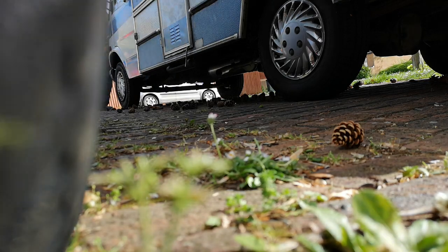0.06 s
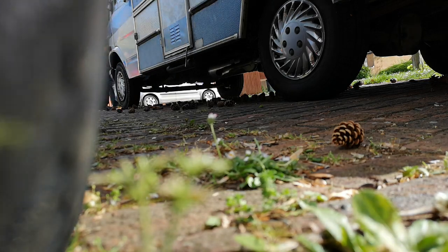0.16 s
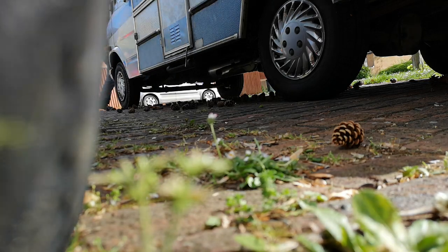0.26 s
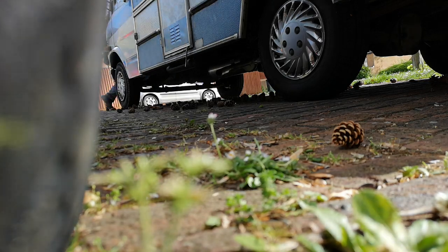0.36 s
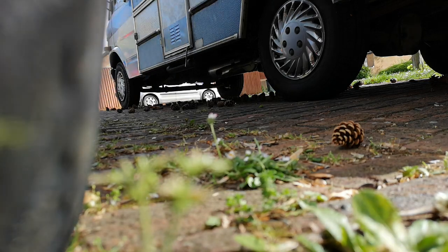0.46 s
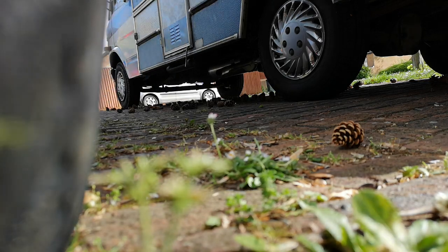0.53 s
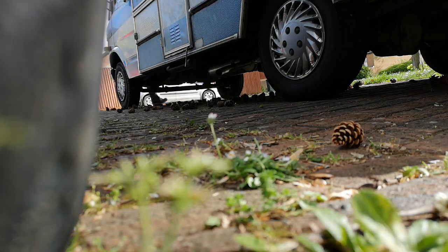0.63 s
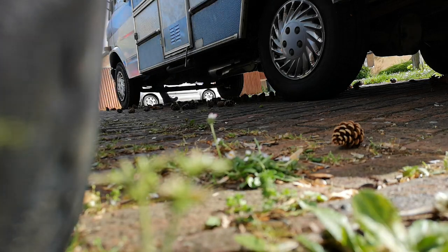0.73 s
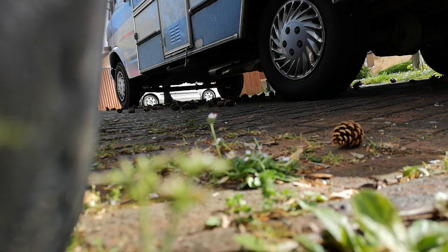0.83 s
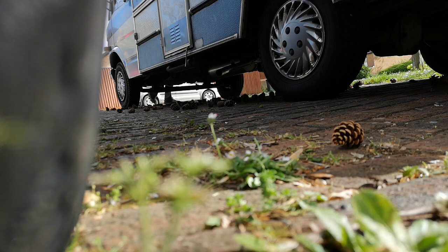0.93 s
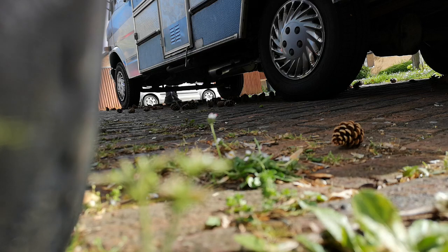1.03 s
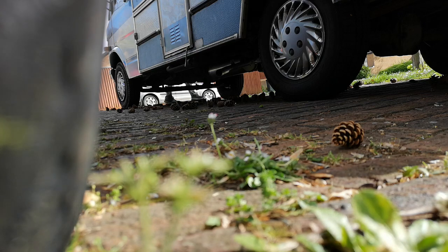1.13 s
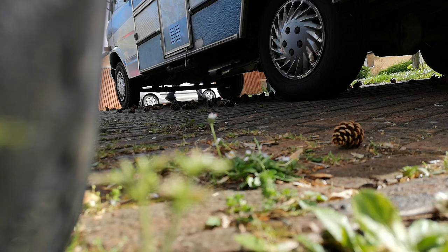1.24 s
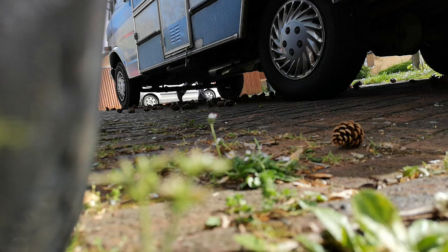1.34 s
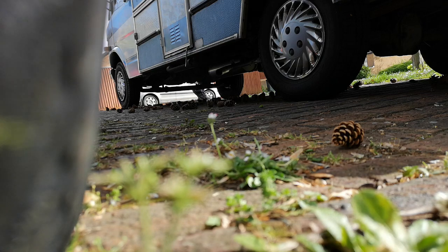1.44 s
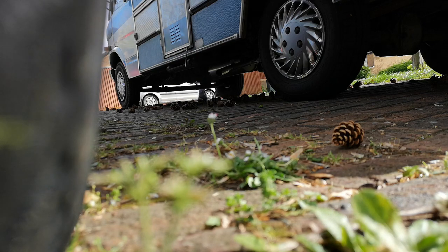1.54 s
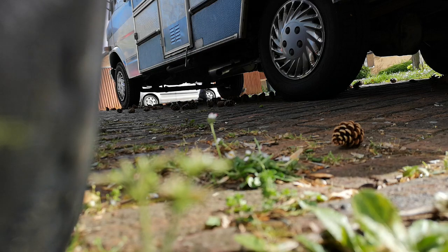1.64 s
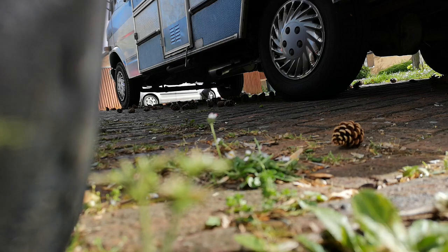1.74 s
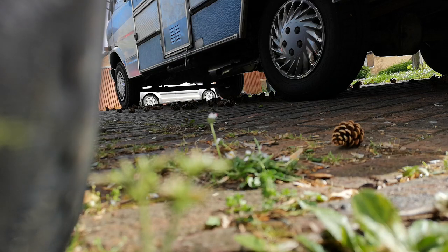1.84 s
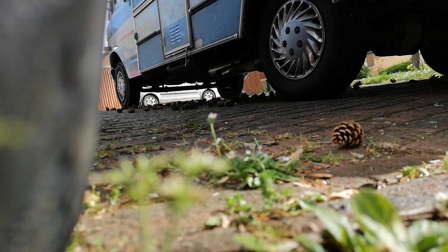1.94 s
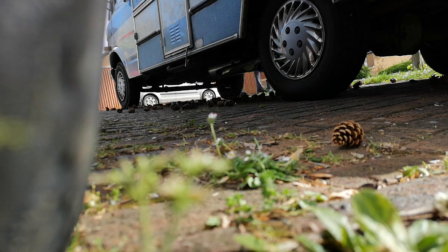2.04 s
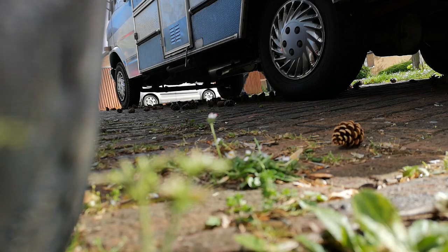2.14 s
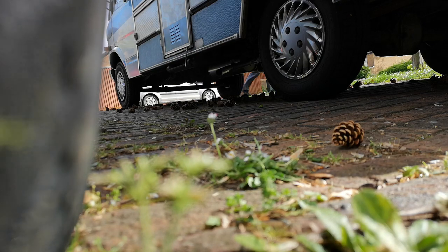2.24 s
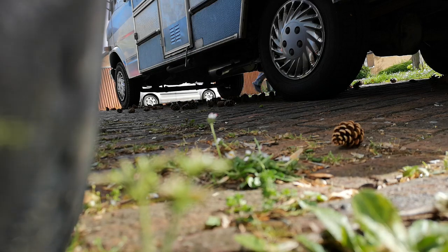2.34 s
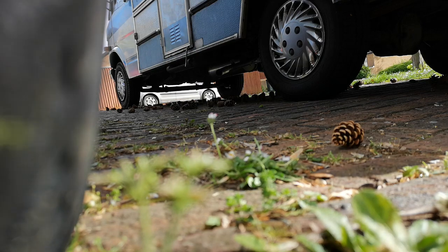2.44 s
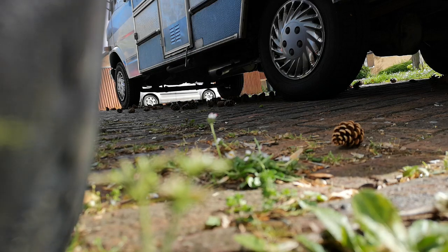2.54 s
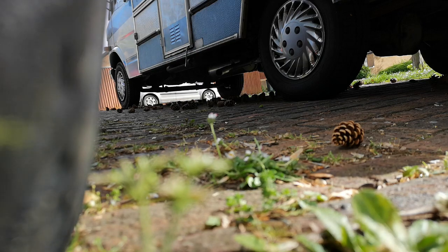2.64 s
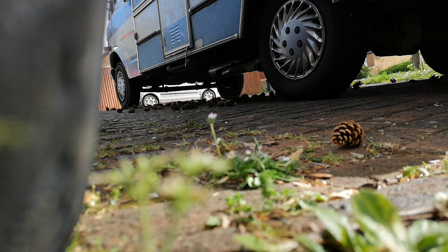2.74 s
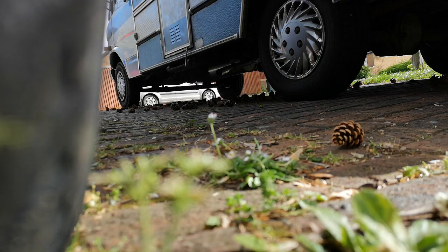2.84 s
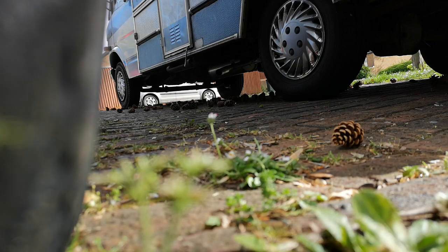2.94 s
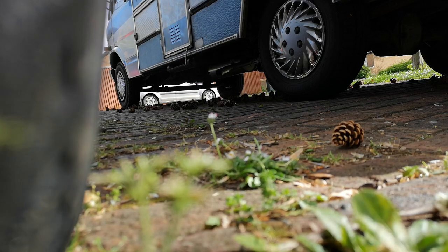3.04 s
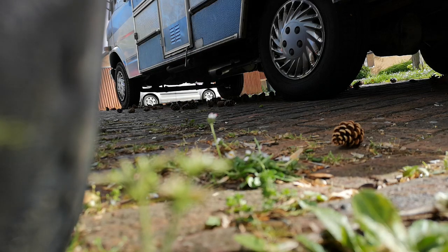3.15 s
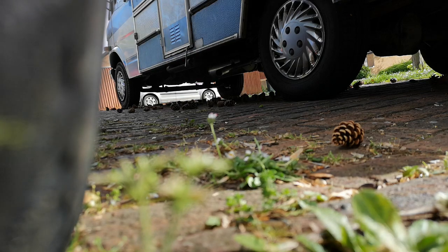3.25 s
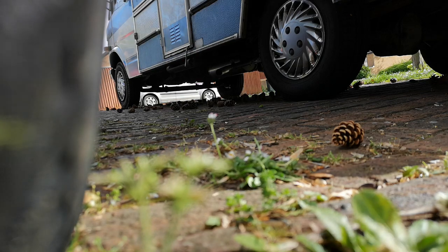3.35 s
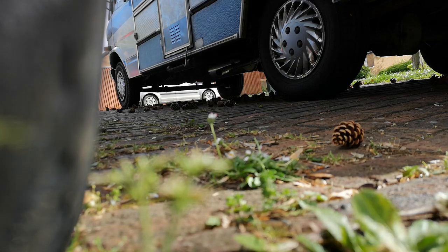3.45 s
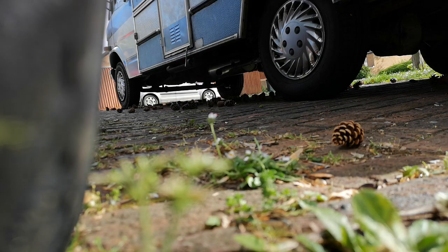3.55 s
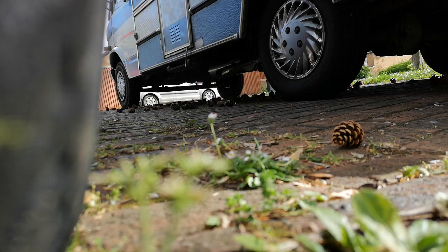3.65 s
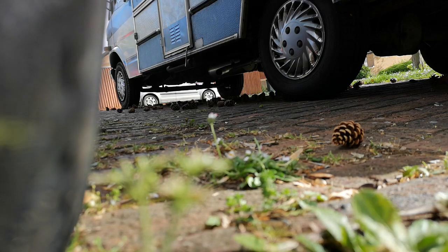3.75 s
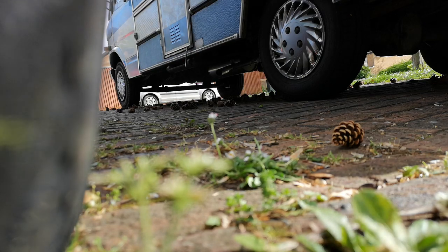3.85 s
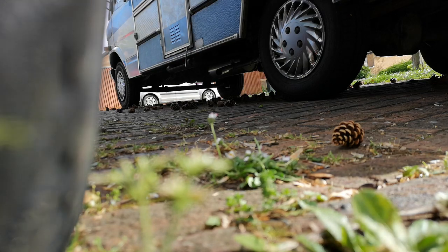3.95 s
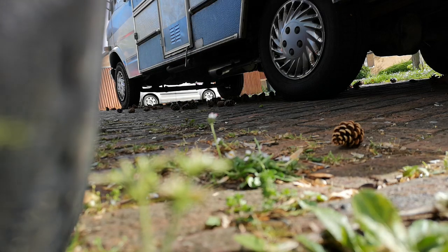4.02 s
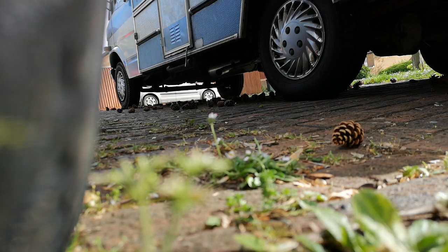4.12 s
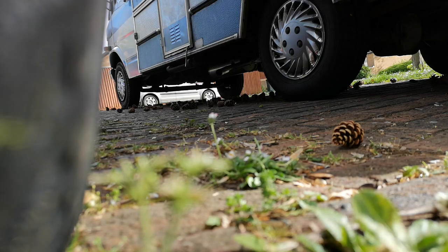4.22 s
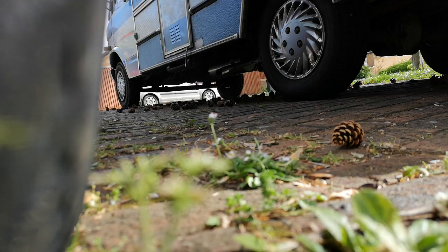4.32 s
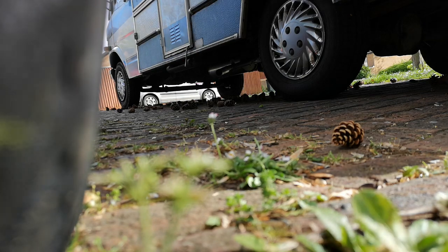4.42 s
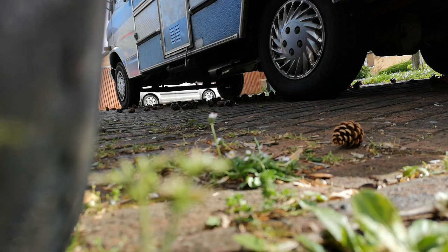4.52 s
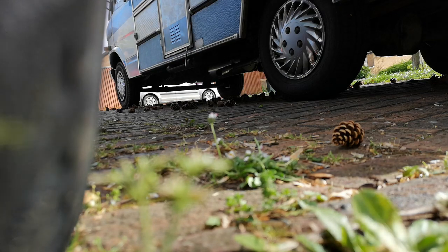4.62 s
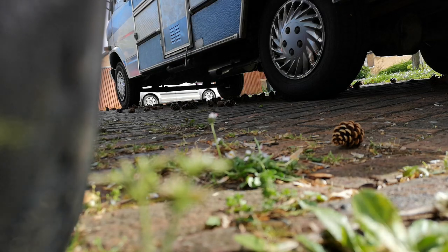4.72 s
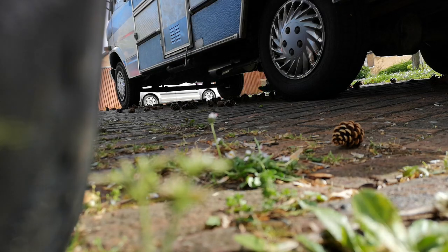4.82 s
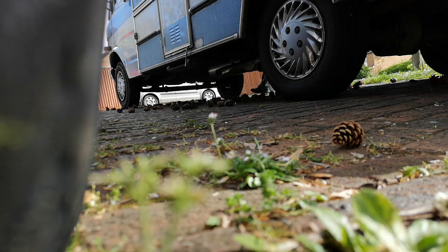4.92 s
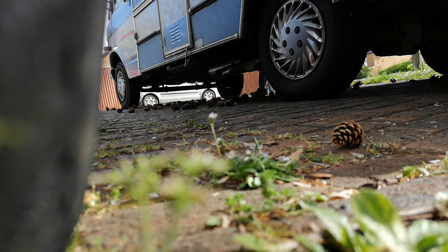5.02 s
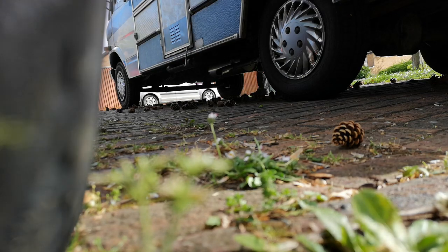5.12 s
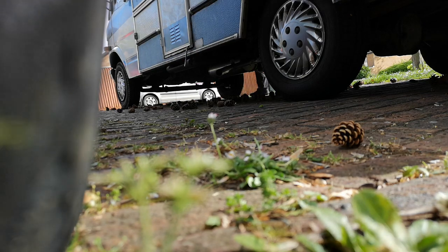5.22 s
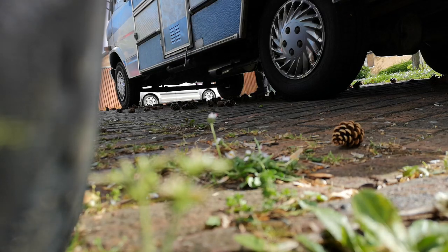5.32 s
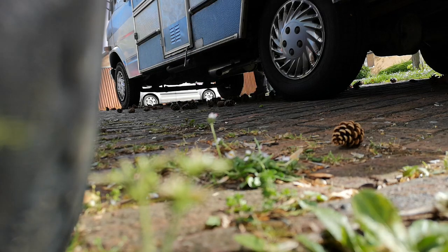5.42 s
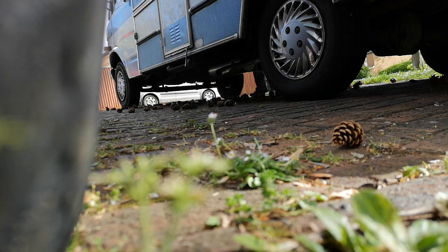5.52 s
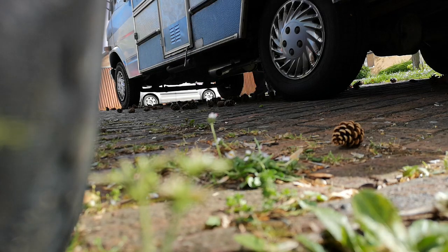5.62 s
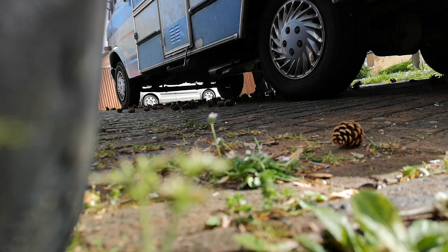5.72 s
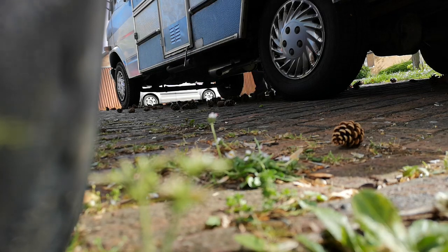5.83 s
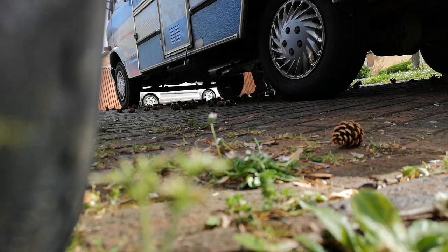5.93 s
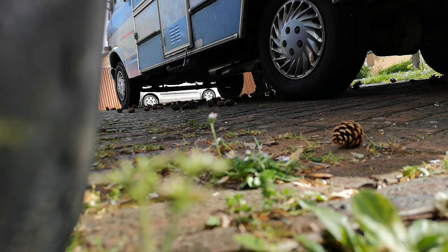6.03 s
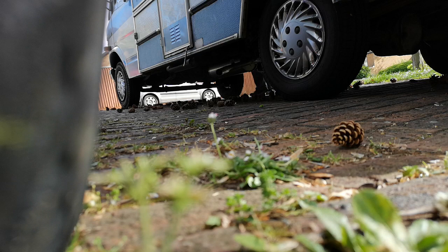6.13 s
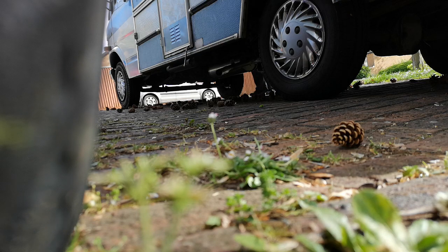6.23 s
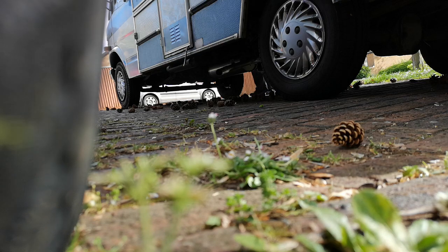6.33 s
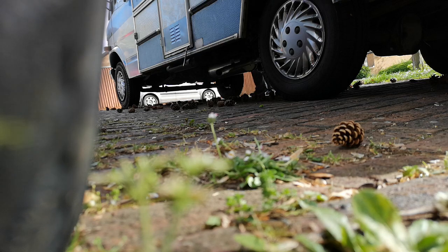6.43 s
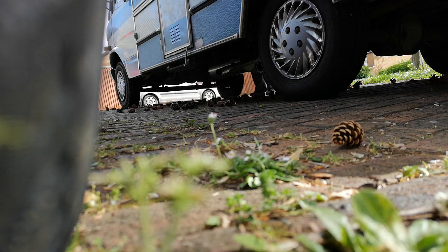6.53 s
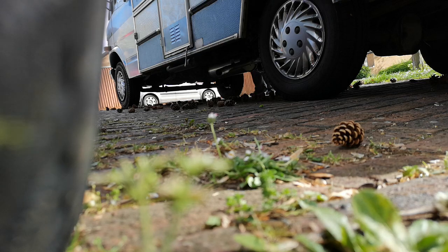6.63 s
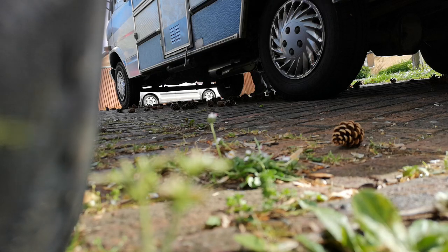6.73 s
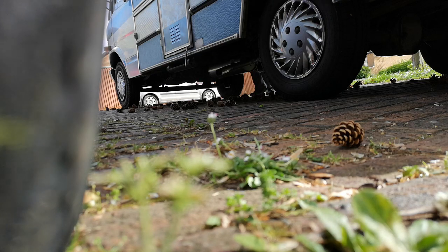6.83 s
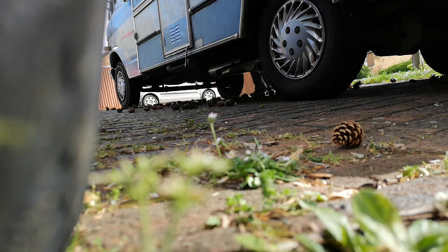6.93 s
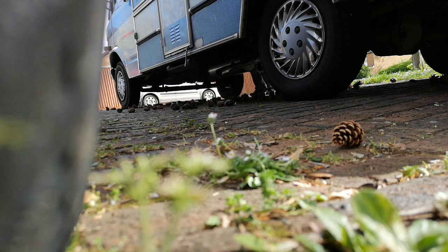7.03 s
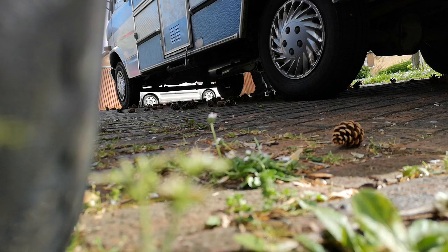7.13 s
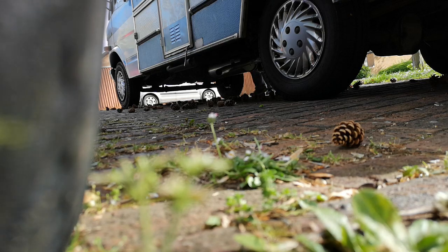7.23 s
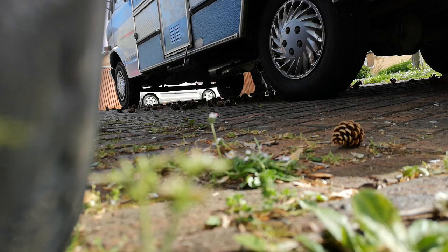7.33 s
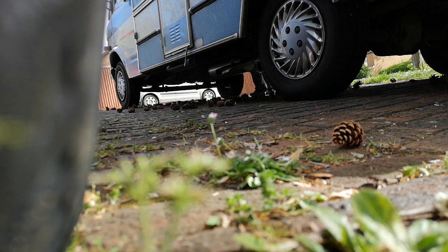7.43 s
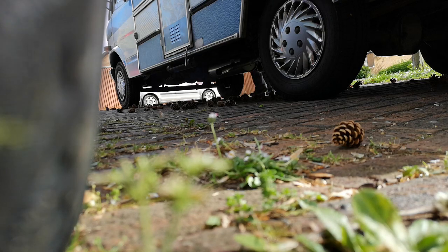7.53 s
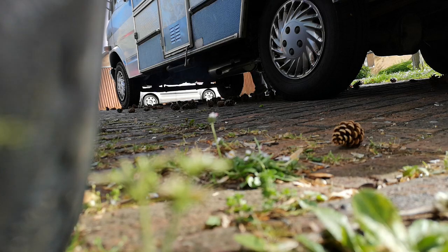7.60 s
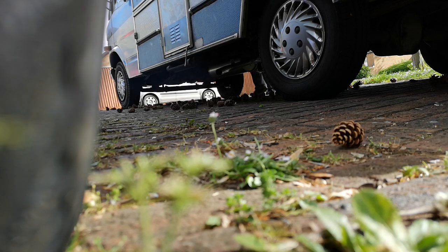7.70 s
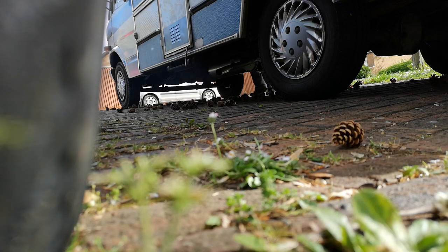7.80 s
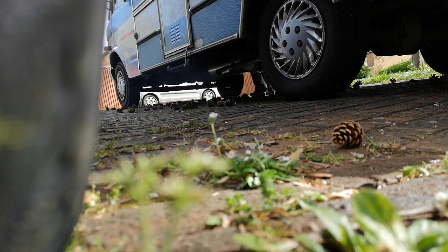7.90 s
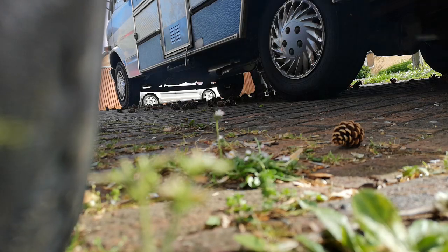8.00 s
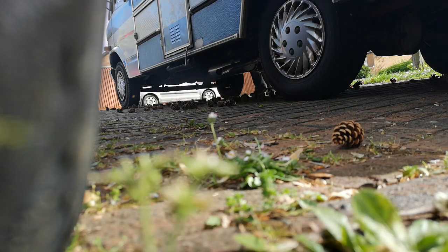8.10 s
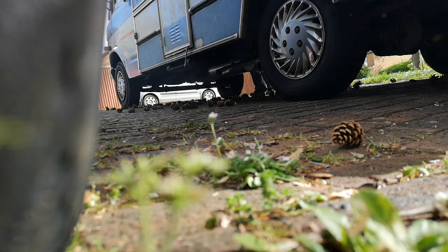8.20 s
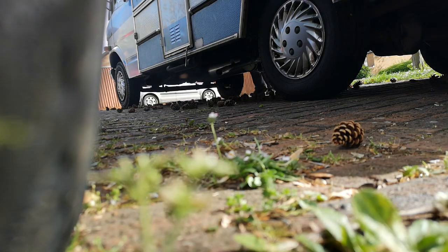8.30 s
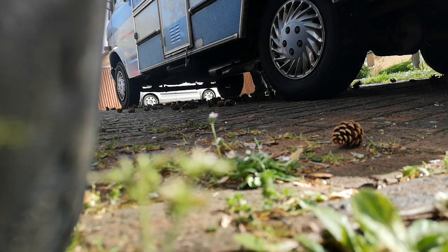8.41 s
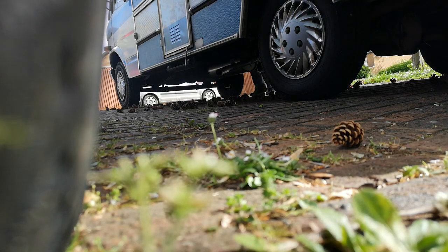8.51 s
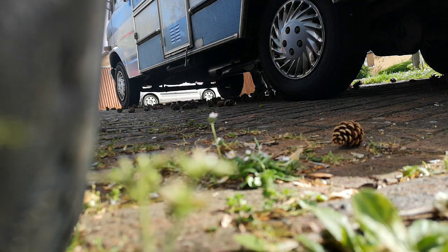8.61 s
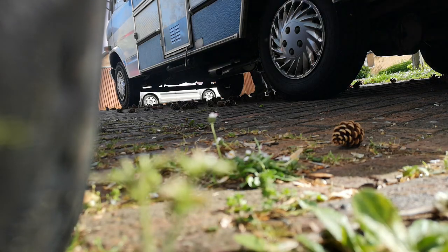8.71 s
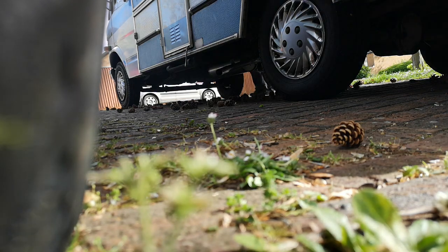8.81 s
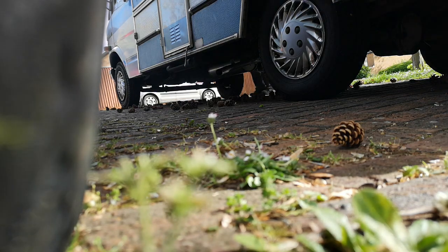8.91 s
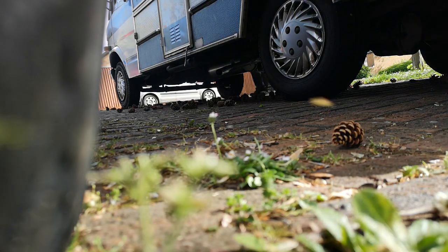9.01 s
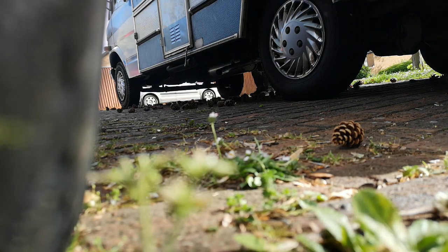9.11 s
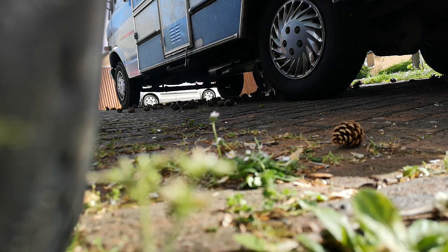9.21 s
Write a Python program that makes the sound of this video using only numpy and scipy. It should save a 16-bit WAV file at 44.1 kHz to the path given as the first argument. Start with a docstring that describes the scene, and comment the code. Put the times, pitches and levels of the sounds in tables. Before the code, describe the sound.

A diesel van idles with a throbbing, clattering rattle outdoors, then one throttle stab booms and cracks before the engine winds down in a drone.

```python
"""A four-cylinder diesel van idles on a paved drive, heard by two microphones on the ground a few metres away.
Idle: firing pulses throb through a silencer filter, bursts of impacts clatter, and the pipe rings and knocks.
One stab of the throttle makes the exhaust boom and crack; then the engine winds down with a deep drone.
A fuel curve drives a flywheel; its crank angle times the pulses, noise bursts and tones of the engine."""
import sys
import numpy as np
from scipy import signal
from scipy.fft import rfft, irfft, next_fast_len
from scipy.io import wavfile
from scipy.ndimage import map_coordinates

SR = 44100
rng = np.random.default_rng(int(sys.argv[2]) if len(sys.argv) > 2 else 0)


def persist_wave(psi):
    """Save psi, clipped to +-1, as 16-bit WAV."""
    counts = np.round(np.clip(psi, -1, 1) * 32767).astype(np.int16)
    wavfile.write(sys.argv[1], SR, np.atleast_2d(counts).T)


N = 408366  # samples


def amp(db):
    """Decibels to amplitude."""
    return 10 ** (np.asarray(db) / 20)


def unit(x):
    """Scale x to an rms of 1."""
    return x / np.sqrt(np.mean(x ** 2) + 1e-20)


def between(x, low, high):
    """0 below low, 1 above high, a straight line between."""
    return np.clip((x - low) / (high - low), 0, 1)


def along(points, hz):
    """Interpolate (frequency [Hz], value) points on a log frequency axis."""
    f, v = np.transpose(points)
    return np.interp(np.log(hz + 1), np.log(f + 1), v)


def wobble(rate, size=4096):
    """A smooth random curve with rate knots a second."""
    s = np.linspace(0, N / SR, size)
    curve = map_coordinates(rng.standard_normal(int(N * rate / SR) + 4), [s * rate])
    return np.interp(np.arange(N) / SR, s, curve)


def filtered(x, response):
    """Multiply the spectrum of x by a response of frequency."""
    m = next_fast_len(N + SR // 2)
    return irfft(rfft(x, m) * response(np.fft.rfftfreq(m, 1 / SR)), m)[..., :N]


def body(x, spectrum, size=16384):
    """Ring x through a causal, minimum-phase body with this spectrum and unit energy gain."""
    cepstrum = irfft(np.log(amp(along(spectrum, np.fft.rfftfreq(size, 1 / SR)))))
    # folding the cepstrum forward in time makes the response causal
    cepstrum[1:size // 2] *= 2
    cepstrum[size // 2 + 1:] = 0
    response = irfft(np.exp(rfft(cepstrum)))
    response = response / np.linalg.norm(response)
    return signal.fftconvolve(np.atleast_2d(x), response[None], axes=1)[:, :N]


# likeness of the two microphones: (frequency [Hz], correlation [-1 to 1])
LIKENESS = [(100, 0.66), (250, 0.4), (500, -0.05), (1600, 0.3), (2400, 0), (4000, 0.27), (10000, -0.12)]


def spread(pair):
    """Mix two unrelated signals into left and right, most alike in the bass."""
    turn = lambda hz: np.arccos(np.clip(along(LIKENESS, hz), -1, 1)) / 2
    mid, side = filtered(pair, lambda hz: np.array([np.cos(turn(hz)), np.sin(turn(hz))]))
    return np.array([mid + side, mid - side])


def scatter(x, t60):
    """The underbody and paving smear x into a short dense tail, different on each side."""
    t = np.arange(SR // 4) / SR
    tail = rng.standard_normal((2, len(t))) * amp(-60 * t / t60)
    return signal.fftconvolve(x[None], tail / np.linalg.norm(tail[0]), axes=1)[:, :N]


def strikes(times, sizes):
    """Impulses of given sizes at given seconds."""
    return np.bincount(np.clip(np.round(times * SR).astype(int), 0, N), sizes, N + 1)[:N]


def throttle():
    """Fuel from 0 to 1: it rises with the pedal, holds, and dies away after the lift."""
    press_at_s, press_s = 7.0678, .5183
    lift_at_s, close_s = 7.7488, .0998  # close_s is the time constant of the fading fuel
    t = np.arange(N) / SR
    pedal = between(t, press_at_s, press_at_s + press_s)
    return pedal * np.exp(-np.maximum(t - lift_at_s, 0) / close_s)


IDLE_HZ = 24.72  # firings per second at idle


def flywheel(fuel):
    """Firings per second: fuel spins the engine up, friction drags it back towards idle."""
    pull_hz_per_s, coast_s = 181.17, 2.6701  # gain at full fuel, time constant of the coast-down
    return IDLE_HZ + signal.lfilter([pull_hz_per_s / SR], [1, -np.exp(-1 / (SR * coast_s))], fuel)


def firings(crank, lag=0):
    """Time and cylinder of every firing; lag is a share of the firing interval."""
    k = np.arange(1, int(crank[-1]))
    return np.interp(k + lag, crank, np.arange(N) / SR), k % len(CYLINDERS)


def bursts(crank, lag, fall_db):
    """An envelope that jumps once per firing and falls by fall_db before the next."""
    return unit(amp(-fall_db * ((crank - lag) % 1)))


def impacts(crank, jitter_s, scatter_db, count=28):
    """Valves, pump and pistons strike near the same crank angles in every four-firing cycle."""
    cycles = np.arange(int(crank[-1] / len(CYLINDERS)) + 1)[:, None]
    angles = (np.arange(count) + rng.random(count)) / count
    struck_at = (cycles + angles) * len(CYLINDERS)
    times = np.interp(struck_at, crank, np.arange(N) / SR, left=-1, right=-1)
    signs = rng.choice([-1, 1], count)
    sizes = signs * amp(scatter_db * rng.standard_normal(times.shape)) * (times > 0)
    loose = times + jitter_s * rng.standard_normal(times.shape)
    hits = strikes(loose.ravel(), sizes.ravel())
    return unit(hits / np.sqrt(np.gradient(crank)))  # offsets the denser hits at speed


# the cylinders in firing order: (puff [dB], pipe ring [dB], injector tick [dB])
CYLINDERS = [(.5, 1, 2.5), (-.5, -4, -6), (0, -1, 4.5), (-.5, 1, -3.5)]
# pipe and silencer at idle: (frequency [Hz], relative level [dB])
IDLE_PIPE = [(12, -55.5), (25, 4.5), (49, 3), (74, -1), (99, -12), (124, 4), (148, 1), (175, 10),
             (198, -19.5), (230, -22), (300, -19.5), (350, -19.5), (430, -44), (3000, -110)]
# steady tones that the unequal cylinders sound in the silencer: (multiple of firing rate, rms level [dB])
SILENCER_TONES = [(1.5, -53), (2.75, -53), (6.25, -44), (6.75, -52), (7.25, -45), (7.5, -44), (7.75, -53),
                  (9, -52), (9.5, -51), (10.5, -55), (11, -56), (11.5, -57), (13.5, -57)]
# soft rumble: (frequency [Hz], relative level [dB])
RUMBLE = [(15, -20), (45, 1), (100, -2), (180, 0), (215, -6), (300, -7.5), (500, -40), (3000, -110)]


def idle(crank, idling):
    """Slow uneven puffs throb and hum in the silencer over a soft rumble and a thin, wavering alternator whine."""
    times, cylinder = firings(crank, lag=-0.016)
    sizes = amp(np.array(CYLINDERS)[cylinder, 0] + .4 * rng.standard_normal(len(times)))
    # the valve lets the first gas out; the rising piston pushes a second, weaker puff
    second_puff = 0.64 * strikes(firings(crank, lag=0.4806)[0], sizes)
    gas = strikes(times, sizes) + second_puff
    puffs = amp(-32.0) * unit(body(gas * idling, IDLE_PIPE))
    tones = sum(amp(db) * np.sin(2 * np.pi * (k * crank + rng.random())) for k, db in SILENCER_TONES)
    cyclic = .55 * impacts(crank, jitter_s=.0001, scatter_db=1.5)
    random = .7 * spread(rng.standard_normal((2, N)))
    rumble = amp(-42.5) * body(cyclic + random, RUMBLE)
    whine_order, whine_db = 25.5, -57  # multiple of the firing rate, middle level
    whine_level = amp(whine_db + 3 * wobble(rate=8)) * bursts(crank, lag=0, fall_db=5) * idling
    whine = whine_level * np.sin(2 * np.pi * whine_order * crank + .5 * wobble(rate=10))
    return puffs + np.sqrt(2) * idling * tones + rumble + whine


def ticking(times, sizes, rise_s, t60, spectrum, count=24):
    """Short sizzles, rms 1 overall, whose direct part reaches the right side count samples before the left."""
    t = np.arange(SR // 8) / SR
    sizzle = amp(-60 * t / t60) * (1 - np.exp(-t / rise_s))
    envelope = signal.fftconvolve(strikes(times, sizes), sizzle)[:N]
    direct = body(envelope * rng.standard_normal(N), spectrum)[0]
    diffuse = body(envelope * rng.standard_normal((2, N)), spectrum)
    return unit(np.array([np.roll(direct, count), direct]) + 0.9 * diffuse)


# block at idle: (frequency [Hz], relative level [dB])
IDLE_BLOCK = [(150, -6), (300, -5), (430, -5), (600, -3.5), (780, -8), (1150, -6.5), (1650, -1),
              (2100, -6.5), (2700, -10.5), (3400, -15), (4200, -28), (6500, -25.5), (7500, -23),
              (9300, -34.5), (11500, -45), (15000, -79)]
# injectors: (frequency [Hz], relative level [dB])
INJECTOR = [(1000, -25.5), (2200, 15), (3500, 7.5), (4100, -5), (4700, 2.5), (5000, 5.5), (5300, -4.5),
            (5900, 2.5), (6500, -3.5), (7600, 0), (9300, -8.5), (11500, -26.5), (15000, -33)]
# loose valves, at the same places in every cycle: (place [firings into the cycle], relative level [dB])
VALVE_TAPS = [(1.1, -1), (2.1, 1), (2.78, 0)]
# ring of a valve tap: (frequency [Hz], relative level [dB])
VALVE = [(3000, -28), (6400, -6), (7300, 2), (7900, 2.5), (9200, -7.5), (10500, -19), (12000, -25),
         (15000, -49)]


def idle_clatter(crank, idling):
    """The block knocks with each firing; the injectors sizzle and snap shut, and three valves tap in between."""
    metal = scatter(impacts(crank, jitter_s=.00008, scatter_db=3.5), t60=0.059)
    metal = metal + 1.1 * rng.standard_normal((2, N))
    block = amp(-38.0) * unit(body(metal * bursts(crank, lag=0.036, fall_db=1.5), IDLE_BLOCK))
    times, cylinder = firings(crank, lag=0.13)
    sizes = amp(np.array(CYLINDERS)[cylinder, 2] + rng.standard_normal(len(times)))
    sizzle = amp(-44) * ticking(times, sizes, rise_s=.011, t60=.085, spectrum=INJECTOR)
    shut_s = firings(crank, lag=.32)[0]
    shut = amp(-53.5) * ticking(shut_s, sizes, rise_s=.0002, t60=.012, spectrum=INJECTOR)
    place, db = np.transpose(VALVE_TAPS)
    angles = np.arange(0, crank[-1], len(CYLINDERS))[:, None] + place
    tap_s = np.interp(angles, crank, np.arange(N) / SR).ravel()
    tap_sizes = amp(db + rng.standard_normal(angles.shape)).ravel()
    taps = amp(-55.5) * ticking(tap_s, tap_sizes, rise_s=0.0016, t60=0.098, spectrum=VALVE)
    return idling * (spread(block) + sizzle + shut + taps)


# modes of the pipe wall: (frequency [Hz], relative level [dB], decay by 60 dB [s])
STEEL = [(924, -9, 0.093), (1215, -11, 0.086), (1470, -11, 0.046), (1500, -4, 0.087), (1533, -5, 0.31),
         (1647, 4, 0.09), (1673.4, 1.5, 0.05), (1742, -12, 0.16)]


def steel(x, build_s):
    """The pipe wall rings in a few modes; the ring builds up as the pipe flexes."""
    t = np.arange(SR // 4) / SR
    ring = sum(amp(db - 60 * t / t60) * np.sin(2 * np.pi * hz * t) for hz, db, t60 in STEEL)
    ring = ring * (1 - np.exp(-t / build_s))
    return signal.fftconvolve(x, ring / np.abs(ring).max())[:N]


# the hardest knocks of the shaking pipe: (time [s], level driving the ring [dB])
KNOCKS = [(0.1047, -26), (0.347, -30), (0.4307, -26), (0.4685, -25), (1.077, -27), (1.8856, -27),
          (2.6933, -29), (2.875, -26.5), (4.19, -27), (4.5121, -28), (4.803, -30), (5.122, -28),
          (5.524, -28), (5.97, -29), (6.0918, -25), (6.414, -29), (6.779, -27)]
# sharp contact of a knock, also the snap of an exhaust crack: (frequency [Hz], relative level [dB])
SNAP = [(300, -2.5), (800, -2), (1200, 0), (1600, 2), (2100, -4), (3000, -7), (4200, -23), (8000, -44),
        (15000, -42)]


def pipe_rattle(crank, idling):
    """Each firing shakes the pipe into ringing, with a rebound; now and then it knocks harder."""
    times, cylinder = firings(crank)
    sizes = amp(-35.5 + np.array(CYLINDERS)[cylinder, 1] + 2.4 * rng.standard_normal(len(times)))
    s, db = np.transpose(KNOCKS)
    sizes = sizes * (np.abs(times[:, None] - s).min(1) > .015)  # a knock takes the place of the shake
    loose = times + .001 * rng.standard_normal(len(times))
    rebound_s = loose + .012 + 0.00293 * rng.standard_normal(len(times))
    shakes = strikes(loose, sizes) + strikes(rebound_s, 0.79 * sizes)
    ring = steel(shakes * idling + strikes(s, amp(db)), build_s=.0012)
    contact = body(strikes(s, amp(db + 5.5)), SNAP)[0]
    return ring + contact + amp(-9) * scatter(ring + contact, t60=.08)


# low hum: (frequency [Hz], relative level [dB])
HUM_BAND = [(150, -21.5), (240, -7), (300, 0.5), (360, -3.5), (430, -25.5), (3000, -110)]


def hum():
    """Low band-shaped noise: a faint hum that swells once and settles."""
    rest_db, swell_db = -51.5, 11.5
    swell_at_s, half_width_s = 3.89, 0.95
    swell = np.exp(-((np.arange(N) / SR - swell_at_s) / half_width_s) ** 2)
    return amp(rest_db + swell_db * swell) * spread(body(rng.standard_normal((2, N)), HUM_BAND))


def air():
    """A faint even hiss of white noise."""
    return amp(-77) * rng.standard_normal((2, N))


def effort(law, speed, fuel):
    """Gain of a noise that grows with engine speed and with fuel."""
    racing_hz = 100  # firing rate at which the first level of the law holds
    db, octave_db, fuel_db = law
    return amp(db + octave_db * np.log2(speed / racing_hz) + fuel_db * fuel)


# laws of the racing noises:
# (gain coasting at 100 firings/s [dB], rise with speed [dB per octave], rise at full fuel [dB])
ROAR_LAW = (-22.6, 9, .5)
SINGING_LAW = (-26.8, 10.5, 4)
HISS_LAW = (-39, 7, 15.5)
# block at speed: (frequency [Hz], relative level [dB])
REV_BLOCK = [(25, -19), (55, 3.5), (170, 10.5), (250, -6), (340, -1), (430, -10.5), (680, -8), (800, -9),
             (1020, -3.5), (1200, -4), (1700, -4), (2500, -2.5), (3200, -18), (4500, -50), (15000, -44)]
# resonances of block and cylinder head: (frequency [Hz], width [Hz], relative level [dB])
HEAD = [(493, 11, -3), (802, 22, -1), (925, 20, -3), (1135, 35, 0), (1271, 16, -1), (1346, 16, -1),
        (1495, 35, 2), (1550, 20, 2), (1670, 45, 2), (2205, 30, 0), (2535, 30, 1), (2688, 30, 2.5),
        (3550, 24, -7), (3720, 35, -11)]
# pulsing hiss: (frequency [Hz], relative level [dB])
HISS = [(2000, -3.5), (3800, 3), (4700, -11), (6400, -1), (7300, 9), (7900, 2.5), (8600, -4), (10200, -9.5),
        (12000, -22.5), (15000, -55)]


def rev_clatter(crank, speed, fuel):
    """At speed the impacts merge into a gritty roar; block and head sing in it and a pulsing hiss tops it."""
    revving = np.maximum(between(speed, IDLE_HZ, IDLE_HZ + 2.7), .08)  # a trace remains at idle
    metal = scatter(impacts(crank, jitter_s=.00007, scatter_db=2), t60=.06)
    metal = metal + .85 * rng.standard_normal((2, N))
    drive = unit(metal) * bursts(crank, lag=0.013, fall_db=5.0)
    roar = effort(ROAR_LAW, speed, fuel) * body(drive, REV_BLOCK)

    def castings(f):
        modes = sum(amp(db) * 1j * f * w / (hz * hz - f * f + 1j * f * w) for hz, w, db in HEAD)
        return modes / (1 + (f / 6330) ** 4)  # the castings radiate little above 6330 Hz

    shaking = rng.standard_normal((2, N)) * bursts(crank, lag=0.017, fall_db=3)
    singing = effort(SINGING_LAW, speed, fuel) * unit(filtered(shaking, castings))
    gusts = rng.standard_normal((2, N)) * bursts(crank, lag=0.012, fall_db=4.5)
    hiss = effort(HISS_LAW, speed, fuel) * body(gusts, HISS)
    return revving * spread(roar + singing + hiss)


# exhaust under throttle: (frequency [Hz], relative level [dB])
OPEN_PIPE = [(20, -37), (60, -21), (95, -2.5), (125, 7), (150, 5), (190, 0), (240, -18), (350, -23),
             (520, -22), (800, -40.5), (5000, -100)]
# tone of the firing rate at full fuel: (firing rate [Hz], rms level [dB])
SURGE = [(26, -33), (33, -10.5), (46, -13), (58, -14.5), (72, -27), (85, -49)]
# tone of the firing rate when coasting: (firing rate [Hz], rms level [dB])
DRONE = [(45, -77), (72, -13), (86, -11), (98, -13), (105, -16)]
# second and third multiples when coasting: (tone frequency [Hz], rms level [dB])
DRONE_OVERTONES = [(110, -77), (148, -19), (168, -32), (198, -19), (210, -28.5), (228, -30), (250, -52),
                   (320, -54)]


def exhaust(crank, speed, fuel):
    """Under throttle hard, churning pulses boom through the pipe; off throttle a round drone is left."""
    boom_db, boom_power = -11, 1.9  # gain at full fuel, power of the fuel that it grows with
    silencer_delay_s = .0155  # the surge takes this long to pass the silencer
    times, _ = firings(crank)
    uneven = times + .0002 * rng.standard_normal(len(times))
    pulses = strikes(uneven, amp(rng.standard_normal(len(times)))) / np.sqrt(np.gradient(crank))
    churn = .12 * rng.standard_normal(N) * bursts(crank, lag=0, fall_db=8)
    boom = amp(boom_db) * fuel ** boom_power * body(churn + pulses, OPEN_PIPE)
    angle = 2 * np.pi * crank
    surge = fuel * amp(along(SURGE, speed)) * np.cos(angle - 2 * np.pi * speed * silencer_delay_s)
    drone = (1 - fuel) * amp(along(DRONE, speed)) * np.cos(angle + np.pi / 3)
    overtones = sum(amp(along(DRONE_OVERTONES, k * speed)) * np.sin(k * angle) for k in (2, 3))
    return boom + np.sqrt(2) * (surge + drone + (1 - fuel) * overtones)


# gas at the tailpipe: (frequency [Hz], relative level [dB])
BILLOW = [(12, -17), (25, -8), (45, -6), (70, -9), (200, -55), (3000, -110)]


def billow(speed):
    """At speed the gas leaves the tailpipe in uneven low gusts."""
    gusts = amp(-34.5 + 3 * wobble(rate=7))
    return between(speed, IDLE_HZ, 70) * gusts * body(rng.standard_normal(N), BILLOW)


# diesel knocks as the fuel comes in: (time [s], bright snap [dB], ring [dB], ring pitch [Hz])
PINGS = [(7.1563, -50, -36, 2480), (7.1790, -48, -33, 2480), (7.2097, -25, -25, 2480),
         (7.2465, -31, -25, 2480), (7.2775, -27, -24, 2480), (7.3105, -23, -21, 2480),
         (7.3369, -18, -25, 2650), (7.3633, -27, -31, 2650), (7.3893, -27, -30, 2650),
         (7.412, -28, -29, 2650), (7.4345, -19, -24, 2680), (7.4551, -24, -29, 2680),
         (7.4746, -25, -28, 2680), (7.4935, -23, -20, 2680), (7.511, -21, -22, 2680),
         (7.562, -23, -23, 2700), (7.668, -24, -24, 2700), (7.751, -27, -22, 2660), (7.761, -26, -22, 2660)]
# bright snap of a knock: (frequency [Hz], relative level [dB])
PING_SNAP = [(1200, -37), (2000, -10), (2450, 10), (2850, -6), (3200, -5.5), (3850, -0.5), (4500, -13.5),
             (6500, -9), (7300, 1), (8200, -9), (10000, -15), (15000, -38)]
# modes of its ring: (ratio to its pitch, relative level [dB])
PING_MODES = [(.925, 1), (1, 3), (1.12, -4), (1.5, -9)]


def pings():
    """Under throttle each sudden combustion snaps brightly and rings with a pitch that sags as the gas cools."""
    sharp, sag_s, ring_t60 = .09, .011, .075  # starting sharpness as a share of pitch, time constant, decay
    t = np.arange(SR // 6) / SR
    s, snap_db, _, _ = np.transpose(PINGS)
    envelope = signal.fftconvolve(strikes(s, amp(snap_db)), amp(-60 * t / .055))[:N]
    snaps = body(envelope * rng.standard_normal((2, N)), PING_SNAP)
    glide = np.cumsum(1 + sharp * np.exp(-t / sag_s)) / SR
    rings = np.zeros((2, N))
    for start, _, ring_db, hz in PINGS:
        for ratio, db in PING_MODES:
            drift = 0.073 * np.cumsum(rng.standard_normal((2, len(t))), axis=1)
            phase = 2 * np.pi * rng.random((2, 1)) + drift
            level = amp(ring_db + db - 60 * t / ring_t60) * (1 - np.exp(-t / 0.0015))
            tone = level * np.sin(2 * np.pi * ratio * hz * glide + phase)
            rings[:, round(start * SR):][:, :len(t)] += tone
    return spread(snaps + rings)


# panels that radiate the engine tones: (frequency [Hz], relative level [dB])
PANELS = [(50, -3), (140, -2), (180, 4), (260, 1), (340, 7), (430, -6), (490, -2), (660, -9), (800, 7),
          (900, -6), (1030, -5), (1150, 6), (1350, -1), (1550, 6), (2500, -5)]


def order_tones(crank, speed, fuel, count=20):
    """Engine orders glide with the speed, flutter in level, and swell as they cross the panel resonances."""
    racing = between(speed, 32, 65) * (1 - 0.43 * fuel)
    whole = [(k, -45.5) for k in range(3, count)]
    # unequal cylinders add quarter steps between the multiples, 5 dB weaker per octave
    quarters = [(k / 4, -37 - 5 * np.log2(k / 4)) for k in range(3, 16) if k % 4]
    tones = np.zeros((2, N))
    for multiple, db in whole + quarters:
        phase = 2 * np.pi * (multiple * crank + rng.random())
        apart = np.array([[.5], [-.5]]) * min(multiple / 8, 1) * rng.standard_normal()
        level = amp(db + along(PANELS, multiple * speed) + 3 * wobble(rate=12))
        tones += level * np.sin(phase + apart)
    return racing * tones


# the hardest exhaust cracks: (time [s], level before the snap and ring gains [dB])
CRACKS = [(7.3385, -17), (7.3655, -7.5), (7.3905, -4), (7.414, -5), (7.4575, -13), (7.476, -15),
          (7.5295, -5.5), (7.545, -9), (7.561, -6), (7.576, -5), (7.5908, -6), (7.605, -8), (7.6192, -12),
          (7.6455, -7), (7.682, -10), (7.6938, -2), (7.705, -9), (7.727, -7), (7.7385, -10), (7.748, -5),
          (7.769, -9), (7.79, -6)]
# rasp that follows a crack: (frequency [Hz], relative level [dB])
RASP = [(600, -23), (900, -6.5), (1100, -14), (1330, -5), (1530, 4), (1700, -9), (2000, 3), (2300, -22),
        (4000, -38), (15000, -68)]


def cracks(crank, speed, fuel):
    """The steep front of each loaded pulse cracks out of the tailpipe and leaves a short metallic rasp."""
    front_db, front_power = -32, 5  # gain at full fuel, power of the fuel that it grows with
    ground_s, ground_share = .00072, .65  # the paving returns each crack
    # firing rate at which the pipe shudders most, blow gain there, loss per octave away from it
    shudder_hz, shudder_db, shudder_fall_db = 39.7, 1, 15
    times, _ = firings(crank, lag=0.017)
    s, db = np.transpose(CRACKS)
    plain = np.abs(times[:, None] - s).min(1) > .005  # a hard crack takes the place of the plain front
    sizes = plain * amp(2 * rng.standard_normal(len(times)))
    pulses = strikes(times, sizes) / np.sqrt(np.gradient(crank))
    fronts = amp(front_db) * fuel ** front_power * pulses
    hardest = strikes(s, amp(db))
    snap = body(fronts + amp(9.5) * hardest, SNAP)[0]
    snap = snap + ground_share * np.roll(snap, round(ground_s * SR))
    blows = hardest * amp(shudder_db - shudder_fall_db * np.abs(np.log2(speed / shudder_hz)))
    fade = signal.fftconvolve(blows, amp(-60 * np.arange(SR // 8) / SR / 0.24))[:N]
    rasp = amp(-17.5) * spread(body(fade * rng.standard_normal((2, N)), RASP))
    echo = amp(-12) * spread(scatter(snap, t60=.04))
    return snap + echo + rasp + amp(-7) * steel(blows, build_s=0.0007)


# thin ticks during the coast-down: (time [s], level [dB])
LIGHT_TICKS = [(8.377, -41), (8.572, -49)]
# their colour: (frequency [Hz], relative level [dB])
LIGHT_TICK = [(2000, -30), (6000, 0), (11000, -3), (15000, -8)]


def light_ticks():
    """Two thin, bright ticks of decaying noise as the engine winds down."""
    s, db = np.transpose(LIGHT_TICKS)
    decay = amp(-60 * np.arange(SR // 8) / SR / .05)
    envelope = signal.fftconvolve(strikes(s, amp(db)), decay)[:N]
    return body(envelope * rng.standard_normal(N), LIGHT_TICK)


def scene():
    """The fuel sets the speed; the crank, counted in firings, times the cyclic sounds of the engine."""
    fuel = throttle()
    speed = flywheel(fuel)
    crank = .45 + np.cumsum(speed) / SR
    idling = np.maximum(1 - between(speed, 23.6, 41.0), .03)  # fades with speed, never quite out
    ticking_over = idle(crank, idling) + idle_clatter(crank, idling) + pipe_rattle(crank, idling)
    background = hum() + air()
    racing = sum(source(crank, speed, fuel) for source in (rev_clatter, exhaust, order_tones, cracks))
    return ticking_over + background + racing + billow(speed) + pings() + light_ticks()


# balance of the microphones: (frequency [Hz], left minus right [dB])
BALANCE = [(150, 0.2), (500, 2), (1200, -.5), (2000, 4), (2700, -5.5), (3600, 0), (4700, -9), (7400, -1),
           (10000, -8.5)]


def record(dry):
    """The right microphone gets more of most of the treble; nothing passes above the band limit."""
    top_hz = 15500
    sides = np.array([[.5], [-.5]])
    return filtered(dry, lambda hz: amp(sides * along(BALANCE, hz)) * (hz < top_hz))


dry = scene()
out = record(dry)
persist_wave(out)
```